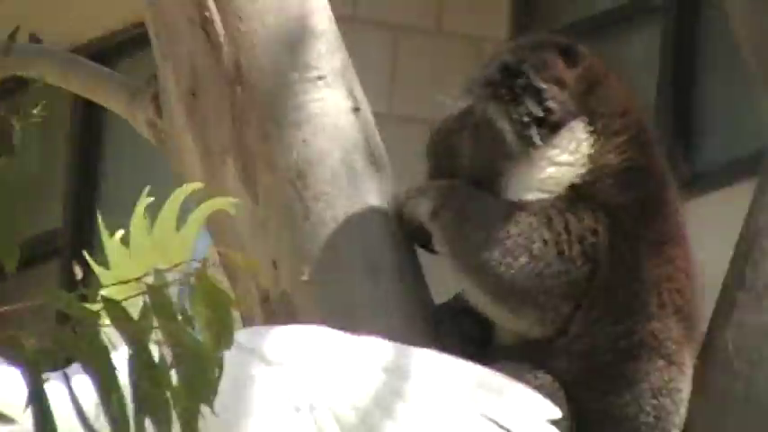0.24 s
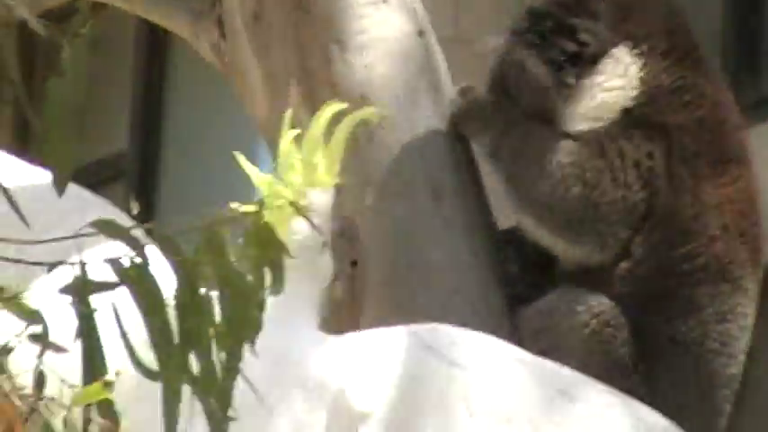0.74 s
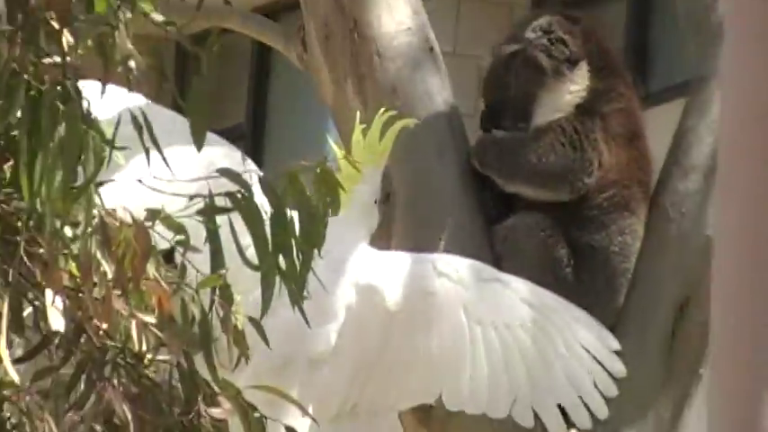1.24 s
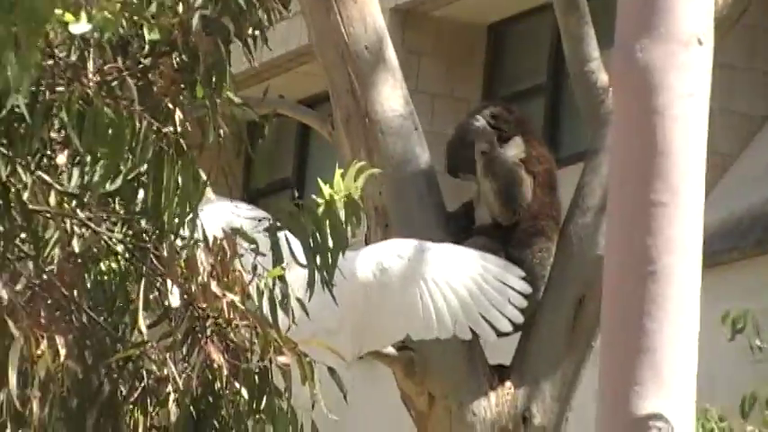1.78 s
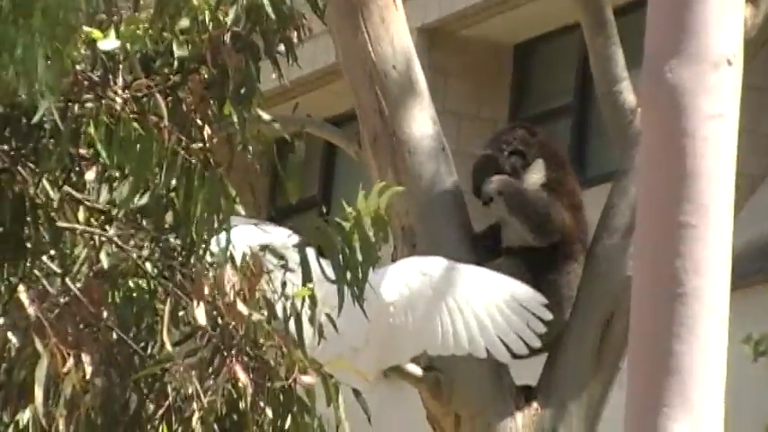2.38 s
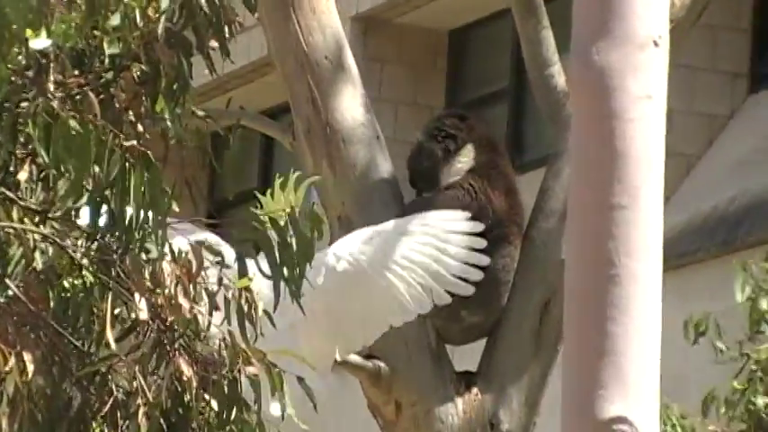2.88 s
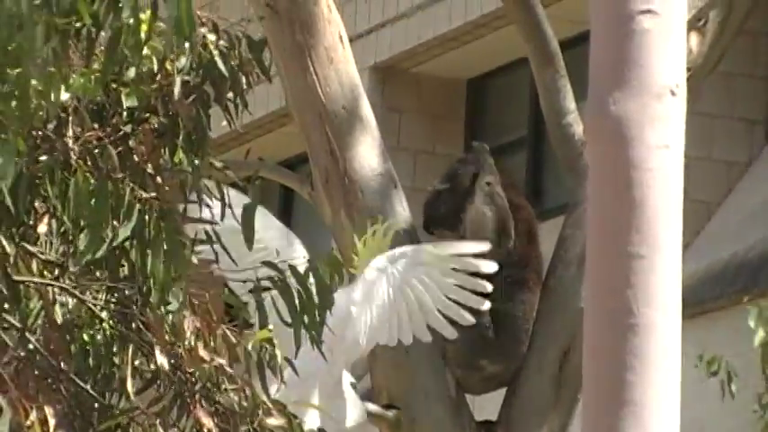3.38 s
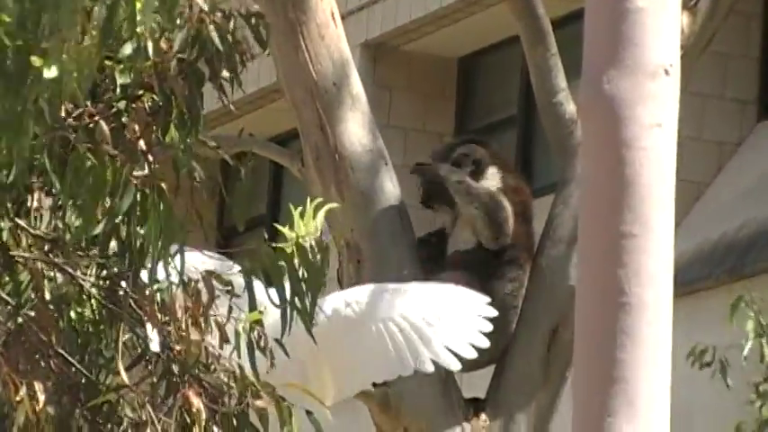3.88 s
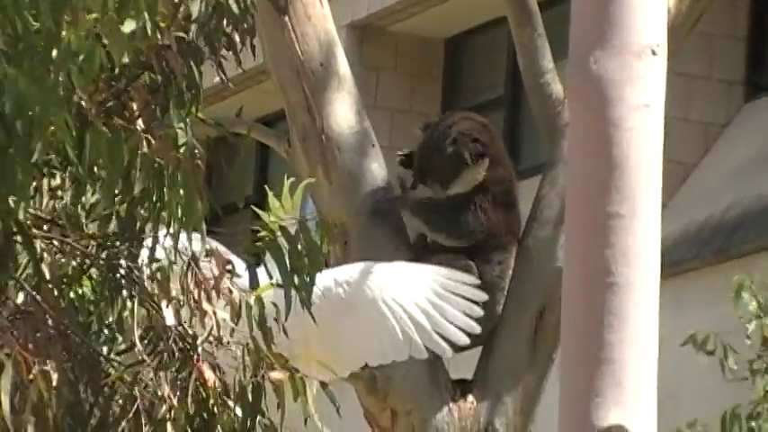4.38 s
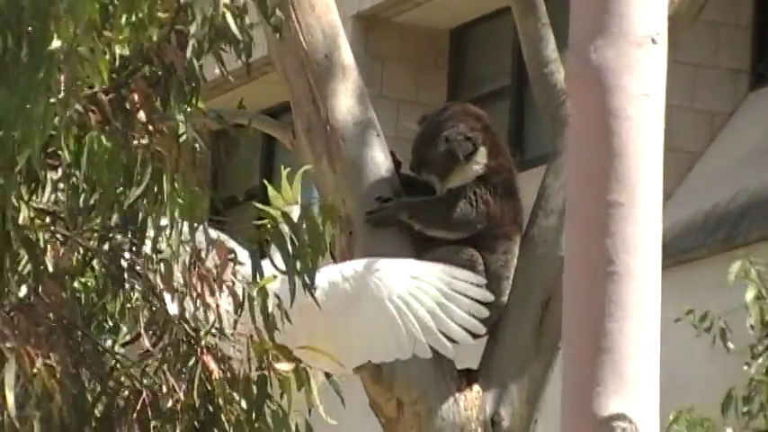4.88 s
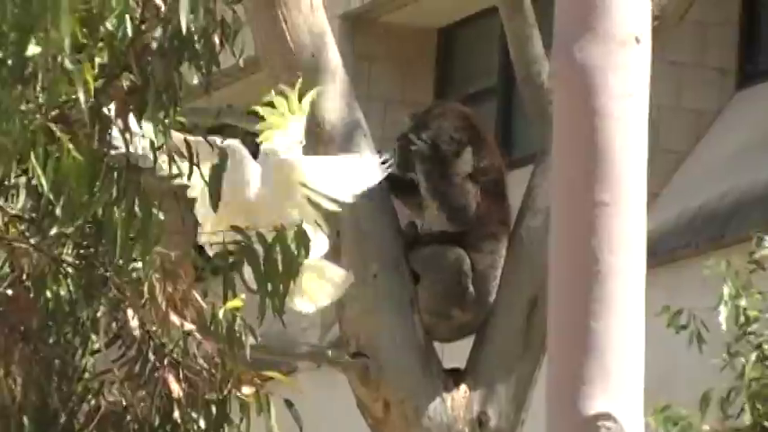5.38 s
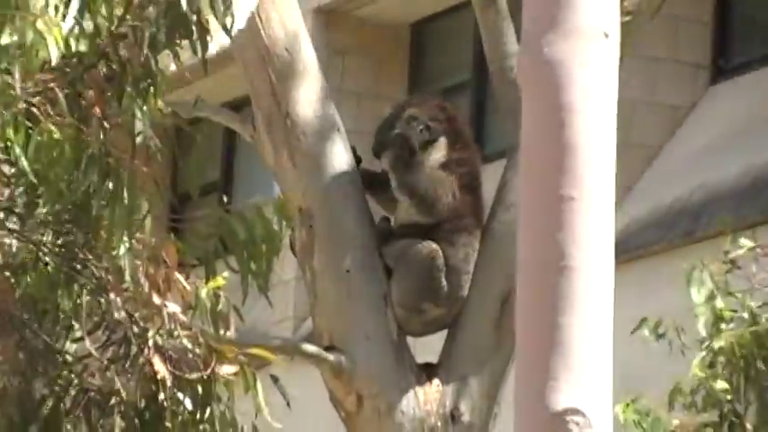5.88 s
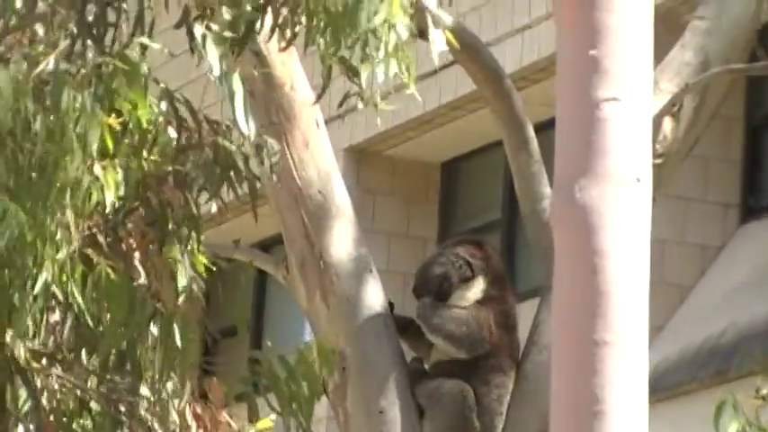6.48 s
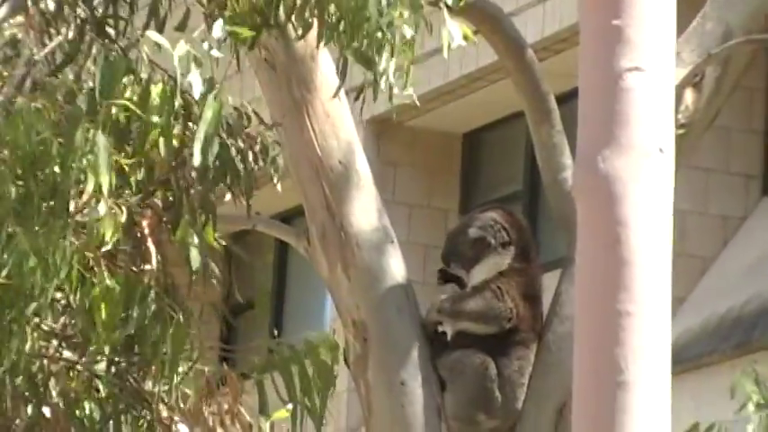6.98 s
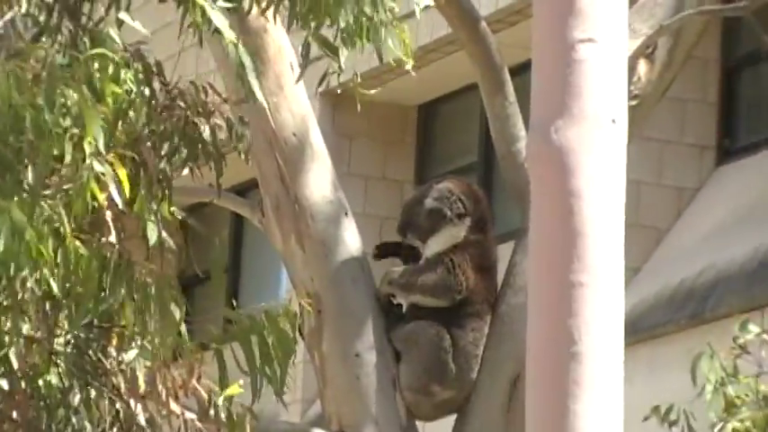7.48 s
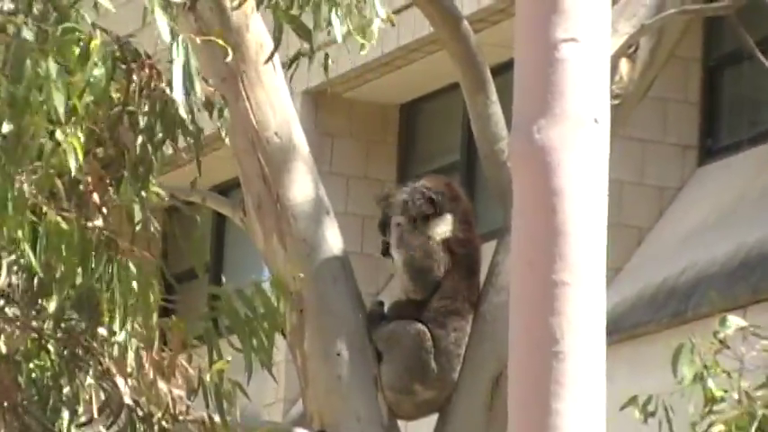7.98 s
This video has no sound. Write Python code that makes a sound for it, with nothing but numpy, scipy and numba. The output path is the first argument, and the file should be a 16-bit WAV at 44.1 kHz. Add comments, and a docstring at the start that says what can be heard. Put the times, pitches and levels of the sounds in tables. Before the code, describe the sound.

A cockatoo screeches from a tree beside a building, five harsh, raspy calls in quick succession, each ringing briefly off the walls. It takes off with a few soft wingbeats and a shriller screech, calls again, then gives a last one after a short pause. Wind buffets the microphone now and then over a quiet suburban murmur.

```python
"""A cockatoo screeches from a tree beside a brick building: its syrinx buzzes near 1 kHz, chopped by
a slower flutter, through throat, mouth and beak; walls and trunks ring on. Throughout, wind buffets
the two microphone ports in opposite sense over a quiet suburban murmur. After five screeches, near
5.2 s, the bird takes off with four wingbeats and calls three more times, drifting slightly left."""
import sys
import numpy as np
from scipy import signal
from scipy.fft import rfft, irfft, next_fast_len
from scipy.io import wavfile
from scipy.ndimage import uniform_filter1d
from numba import njit

SR = 44100
rng = np.random.default_rng(int(sys.argv[2]) if len(sys.argv) > 2 else 0)


def to_wav(s):
    """Save 16-bit WAV."""
    ch = np.atleast_2d(s).T  # columns
    pcm = np.round(np.clip(ch, -1, 1) * 32767)  # PCM
    wavfile.write(sys.argv[1], SR, pcm.astype(np.int16))


N = 363819
CLOSING_BEAK_HZ = 2334


def undb(db):
    """Decibels to gain."""
    return 10 ** (np.asarray(db) / 20)


def unit(x):
    """Scale to rms 1."""
    return x / np.sqrt(np.mean(x ** 2))


def stereo(mid, side):
    """Left and right from mid and side."""
    return np.array([mid + side, mid - side])


def curve(points):
    """Interpolate (time_s, value) points per sample."""
    return np.interp(np.arange(N) / SR, *np.transpose(points))


def walk(rate_hz):
    """Random steps, smoothed twice; rms 1."""
    hold = int(SR / rate_hz)
    steps = np.repeat(rng.standard_normal(N // hold + 1), hold)
    return unit(uniform_filter1d(uniform_filter1d(steps, hold), hold)[:N])


def colour(x, points):
    """Zero-phase filter from (freq_hz, gain_db) points."""
    size = next_fast_len(len(x))
    hz, db = np.transpose(points)
    gain = undb(np.interp(np.log(np.fft.rfftfreq(size, 1 / SR) + 1), np.log(hz), db))
    return irfft(rfft(x, size) * gain, size)[:len(x)]


def ring(x, points):
    """Minimum-phase filter from (freq_hz, gain_db) points: rings only after a click."""
    magnitude = np.abs(rfft(colour(signal.unit_impulse(2048), points)))
    cepstrum = irfft(np.log(magnitude + 1e-9))
    cepstrum[1:1024] *= 2
    cepstrum[1025:] = 0
    return signal.oaconvolve(x, irfft(np.exp(rfft(cepstrum))))[:len(x)]


@njit
def bandpass(x, centre_hz, width_hz):
    """State-variable filter; gain 1 at its moving centre."""
    y, band_state, low_state = np.empty(len(x)), 0., 0.
    for i in range(len(x)):
        g, damping = np.tan(np.pi * centre_hz[i] / SR), width_hz / centre_hz[i]
        band = (band_state + g * (x[i] - low_state)) / (1 + g * (g + damping))
        band_state, low_state = 2 * band - band_state, low_state + 2 * g * band
        y[i] = damping * band
    return y


def pulses(rate_hz, jitter, scatter_db):
    """One click a cycle, uneven in spacing and strength; returns clicks and phase (0-1)."""
    draws = rng.standard_normal((N // 20, 2))
    cycles = np.cumsum(rate_hz) / SR
    edges = np.cumsum(np.clip(1 + jitter * draws[:, 0], .3, 3))
    edges = edges[edges < cycles[-2]]
    at = np.interp(edges, cycles, np.arange(N))
    whole, strength = at.astype(int), undb(scatter_db * draws[:len(at), 1])
    clicks = np.zeros(N + 1)
    np.add.at(clicks, whole, strength * (1 - at + whole))
    np.add.at(clicks, whole + 1, strength * (at - whole))
    return clicks[:N], np.interp(cycles, edges, np.arange(len(edges))) % 1


def screech_gestures(t):
    """Each screech swells, arches in pitch and beak opening to its crest and back, sinks and stops."""
    # one screech a row; columns as unpacked below (keynote: lowest partial)
    screeches = [ (-0.2, 0.651, 0.1, 0.05, -19.5, 14.5, 0, 1095, 2250, 2410, -3.5, -9, 0.42, -20.5, 190.9),
                 (0.869, 1.756, 0.1, 1.25, -20, -0.5, 0.2, 1112, 1970, 2550, -1, -8, 0.65, -37, 185.6),
                 (2.106, 2.999, 0.11, 2.69, -17.5, -1.5, -2.05, 1108, 2256, 2570, -4.5, -8, 0.43, -15.5, 185.5),
                 (3.246, 3.969, 0.09, 3.8, -21.5, 3, 2.8, 1113, 2290, 2450, -5, -8, 0.52, -9.5, 169.3),
                 (4.219, 4.979, 0.09, 4.44, -17.5, 1, -2.5, 1095, 2300, 2394, -4.5, -9, 0.59, -15, 115.1),
                 (5.176, 5.929, 0.095, 5.58, -17.5, 0.5, -6, 1071, 2254, 2394, -2.5, -9.5, 0.53, -26, 159.2),
                 (6.074, 6.689, 0.035, 6.2, -25.5, 7, 7.1, 1129, 2179, 2540, -3.5, -11, 0.54, -41, 170.2),
                 (7.562, 8.131, 0.19, 7.84, -18.5, -0.5, -0.5, 1058, 2195, 2346, -9.5, -13.5, 0.75, -12.5, 150.1),
                 ]
    rows = np.array(screeches)
    current = np.searchsorted(rows[1:, 0] - .03, t)
    (start_s, end_s, swell_s, crest_s, level_db, punch_db, fade_db, crest_buzz_hz, opening_beak_hz,
     crest_beak_hz, mouth_db, treble_db, rasp_share, keynote_db, flutter_hz) = rows[current].T
    age_s, left_s = t - start_s, end_s - t
    progress = np.clip(age_s / (end_s - start_s), 0, 1)
    rising = t < crest_s
    ramp = np.where(rising, age_s / (crest_s - start_s), left_s / (end_s - crest_s))
    effort = np.sin(np.clip(ramp, 0, 1) * np.pi / 2)

    def arch(opening_hz, crest_hz, closing_hz, power):
        weight = effort ** power
        return crest_hz * weight + np.where(rising, opening_hz, closing_hz) * (1 - weight)

    punch_s, close_s, scoop_s = 0.11, 0.052, 0.07
    stop_in_s = left_s + close_s / 2
    level_db = level_db + fade_db * progress - 21 * np.clip(1 - age_s / swell_s, 0, 1) ** 2.84
    level_db += punch_db * np.exp(-np.clip((age_s - swell_s) / punch_s, 0, None) ** 2)
    level_db -= 7.5 * np.clip(1 - stop_in_s / close_s, 0, 1)
    gate = np.clip(age_s / 0.0081 + 1, 0, 1) * np.clip(stop_in_s / 0.031 + 1, 0, 1)
    scoop = 1 - 0.12 * np.clip(1 - age_s / scoop_s, 0, 1)
    buzz_hz = scoop * arch(1011.4, crest_buzz_hz, 1028.7, power=0.4)  # climbs early
    beak_hz = arch(opening_beak_hz, crest_beak_hz, CLOSING_BEAK_HZ, power=1.55)  # opens late
    treble_db = treble_db - 2.5 * (progress - .5)
    rasp_share = rasp_share + 0.15 * (.5 - effort)
    return undb(level_db) * gate, buzz_hz, beak_hz, mouth_db, treble_db, rasp_share, keynote_db, flutter_hz


def syrinx(buzz_hz, flutter_hz, rasp_share):
    """A wavering buzz throbs with the flutter; slaps and gated air take over as rasp_share grows."""
    slaps, phase = pulses(flutter_hz, jitter=.1, scatter_db=3.0)
    waver = 1 + .012 * walk(60) + .01 * walk(7)
    buzz, _ = pulses(buzz_hz * waver, jitter=.025, scatter_db=1.5)
    throb = np.exp(-phase / 1.26)
    push = 0.74 + walk(600)  # drifts and flips sign: each overtone spreads into a hoarse band
    tone = unit((buzz - uniform_filter1d(buzz, size=200)) * (1.1 + throb) * push)
    puffs = np.exp(-phase / 0.2) * rng.standard_normal(N)
    breath = throb * rng.standard_normal(N)
    rasp = unit(.8 * unit(slaps - slaps.mean()) + .6 * unit(puffs) + unit(breath))
    return np.sqrt(1 - rasp_share) * tone + np.sqrt(rasp_share) * rasp


def cockatoo():
    """The syrinx drives throat, beak, mouth and windpipe resonances."""
    # head ducks, buzz sags: start_s, end_s, pitch_ratio, beak_hz, mouth_hz, mouth_boost_db
    ducks = [(2.603, 2.781, 0.71, 2030, 2760, 2), (3.37, 3.598, 0.76, 2080, 2720, 5),
             (5.383, 5.45, .8, 2200, 2850, 0.5)]
    # the beak swings round in brief shrill, slapping bursts: peak_s, width_s, boost_db
    surges = [(5.314, 0.059, 5), (5.485, 0.057, 7), (5.645, 0.12, 10.5), (5.794, 0.059, 7),
              (6.125, 0.037, 6.5), (6.2, 0.027, 10.5)]
    # throat response: freq_hz, gain_db
    throat_response = [(300, -42), (650, -27), (1080, -12.5), (1400, -12.5), (1800, -10), (2250, -6.5),
                       (2700, -0.5), (3150, -17), (3700, -13), (4400, -14.5), (5500, -20.5), (7700, -23),
                       (10000, -30), (12500, -43), (14500, -65.5)]
    t = np.arange(N) / SR
    gain, buzz_hz, beak_hz, mouth_db, treble_db, rasp_share, keynote_db, flutter_hz = screech_gestures(t)
    mouth_hz, shrill_db = np.full(N, 2790.), np.zeros(N)
    for start_s, end_s, pitch_ratio, duck_beak_hz, duck_mouth_hz, mouth_boost_db in ducks:
        duck = np.interp(t, [start_s - .02, start_s + .03, end_s - .03, end_s + .02], [0, 1, 1, 0])
        buzz_hz *= 1 - duck * (1 - pitch_ratio)
        beak_hz += duck * (duck_beak_hz - beak_hz)
        mouth_hz += duck * (duck_mouth_hz - mouth_hz)
        mouth_db += mouth_boost_db * duck
        keynote_db -= 6 * duck  # a bent neck damps the windpipe
        shrill_db += 3.5 * duck
    for peak_s, width_s, boost_db in surges:
        shrill_db += boost_db * np.exp(-2 * ((t - peak_s) / width_s) ** 2)
    source = syrinx(buzz_hz, flutter_hz, np.clip(rasp_share + 0.035 * shrill_db, 0, 1))

    throat = unit(ring(source, throat_response))
    beak = unit(bandpass(bandpass(source, beak_hz, width_hz=280.), beak_hz, width_hz=476.))
    mouth = unit(bandpass(bandpass(source, mouth_hz, width_hz=460.), mouth_hz, width_hz=1334.))
    windpipe = unit(bandpass(source, buzz_hz, width_hz=60.))
    beak_db = -4 - 9 * (beak_hz - CLOSING_BEAK_HZ) / 1000
    voice = throat + undb(beak_db) * beak + undb(mouth_db) * mouth + undb(keynote_db) * windpipe

    treble = colour(voice, [(3300, -30), (5500, 0)])
    body = voice - treble
    treble += (undb(shrill_db) - 1) * colour(treble, [(5500, -27), (8000, 2.0)])
    flicker_db = 0.99 * walk(14)
    return (unit(body) + undb(treble_db + flicker_db) * unit(treble)) * gain


def yard_echoes(voice, paths=5, sway_s=.3):
    """Dense decaying echoes, unrelated in mid and side; the swaying bird crossfades between paths."""
    # near walls, far yard: start_s, t60_s, top_hz, level_db
    echoes = [(.006, 0.535, 10700, -3), (0.042, 1.403, 3820, -18.5)]
    # echo side relative to mid: freq_hz, gain_db
    side_response = [(500, -15), (1200, -10), (5000, -8), (8500, -4), (11000, 1)]
    t = np.arange(int(1.3 * SR)) / SR
    position = np.arange(N) / SR / sway_s
    wet = 0
    for path in range(paths):
        distance = np.abs((position - path + paths / 2) % paths - paths / 2)
        weight = np.sqrt(np.clip(1 - distance, 0, 1))
        tails = 0
        for start_s, t60_s, top_hz, level_db in echoes:
            rolloff = [(top_hz / 2, 0), (top_hz * 2, -14)]
            noise = np.array([colour(rng.standard_normal(len(t)), rolloff) for _ in range(2)])
            tail = noise * undb(-60 * t / t60_s) * (t > start_s)
            tails += undb(level_db) * tail / np.sqrt(np.sum(tail[0] ** 2))
        wet += signal.oaconvolve(weight * voice[None], tails, axes=1)[:, :N]
    return stereo(wet[0], colour(wet[1], side_response))


def wind(mid_db=-8, side_db=3.5):
    """Gusts push one port as they pull the other, in quick uneven buffets."""
    # wind spectrum: freq_hz, gain_db
    spectrum = [(25, -31), (60, -3.5), (150, 4.5), (300, 3), (600, -7.5), (1200, -20), (3000, -88)]
    # underlying breeze: time_s, level_db
    breeze = [(0, -53), (2.3, -97), (3.6, -63), (5.0, -58), (5.5, -31), (5.72, -64), (5.95, -44),
              (6.6, -52), (7.3, -59), (8.25, -65)]
    # buffets: peak_s, level_db, length_s
    gusts = [(0.0, -49, 0.055), (3.387, -44, 0.18), (3.814, -40, 0.056), (4.114, -43, 0.095),
             (4.411, -21, 0.15), (4.639, -41, 0.08), (4.94, -36, 0.094), (5.203, -23.5, 0.25),
             (5.998, -40.5, 0.057), (7.51, -38.5, 0.093), (8.159, -29, 0.14)]
    t = np.arange(N) / SR
    buffets = 0
    for peak_s, level_db, length_s in gusts:
        distance = np.maximum(peak_s - t, (t - peak_s) / 1.1) / length_s  # falls slower than it rises
        buffets += undb(level_db - 23.5 * distance)
    strength = (undb(curve(breeze) + 3.0 * walk(8)) + buffets) * undb(2.26 * walk(30))
    mid, side = (unit(colour(rng.standard_normal(N), spectrum)) * strength for _ in range(2))
    return stereo(undb(mid_db) * mid, undb(side_db) * side)


def murmur(level_db=-47, side_db=-10.5):
    """Far traffic and leaves, swelling a little."""
    # murmur spectrum: freq_hz, gain_db
    spectrum = [(25, -28), (160, -3.5), (450, -0.5), (700, 3), (1000, -2.5), (2400, -8), (4000, -17.5),
                (11000, -23.5), (14000, -68)]
    mid, side = (unit(colour(rng.standard_normal(N), spectrum)) for _ in range(2))
    return undb(level_db + 0.47 * walk(2.9)) * stereo(mid, undb(side_db) * side)


def wings(sigma_s=0.033):
    """Each downstroke is a soft low whump."""
    # take-off strokes: peak_s, level_db
    wingbeats = [(5.154, -52), (5.224, -32.5), (5.413, -33.5), (5.592, -55)]
    # whump spectrum: freq_hz, gain_db
    spectrum = [(120, -40.5), (250, -1), (500, -8), (900, 2), (2000, -49)]
    t = np.arange(N) / SR
    strokes = sum(undb(db) * np.exp(-.5 * ((t - peak_s) / sigma_s) ** 2) for peak_s, db in wingbeats)
    return strokes * unit(colour(rng.standard_normal(N), spectrum))


def scene():
    """Panned bird and echoes, plus wings, wind and murmur."""
    # bird's bearing: time_s, left_minus_right_db
    bearing = [(0, -0.4), (5, -0.5), (6.3, 0.5), (6.7, 1.2), (7.6, 0), (8.25, .2)]
    # band the left port favours: freq_hz, side_db
    left_lean = [(4000, -51), (6500, -19), (9000, -6), (11500, -42)]
    voice, pan_db = cockatoo(), curve(bearing)
    bird = stereo(voice, colour(voice, left_lean)) + yard_echoes(voice)
    return bird * undb(np.array([pan_db, -pan_db]) / 2) + wings() + wind() + murmur()


def record(dry, bass_hz=45, top_hz=15300, ceiling=.97):
    """Round the highest peaks, thin the deep bass, cut the top."""
    highpass = signal.butter(2, bass_hz, "high", fs=SR, output="sos")
    lowpass = signal.ellip(10, .2, 80, top_hz, fs=SR, output="sos")
    return signal.sosfilt(np.vstack([highpass, lowpass]), ceiling * np.tanh(dry / ceiling))


dry = scene()
out = record(dry)
to_wav(out)
```